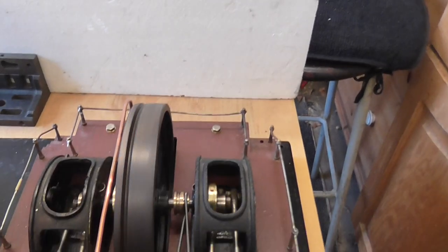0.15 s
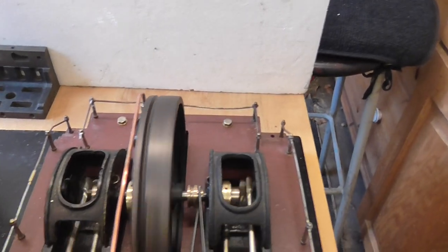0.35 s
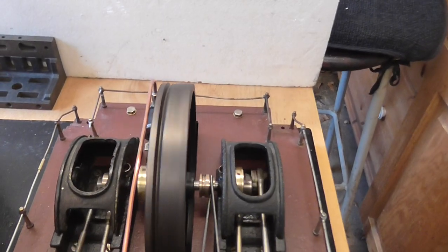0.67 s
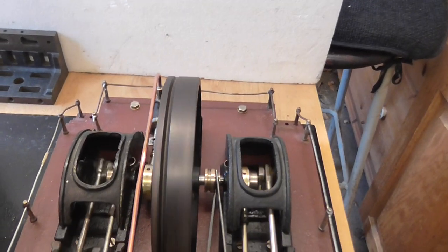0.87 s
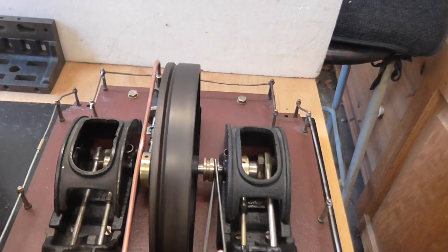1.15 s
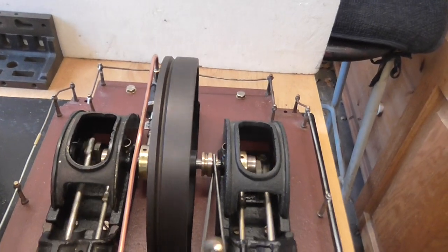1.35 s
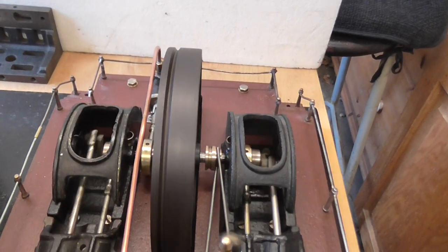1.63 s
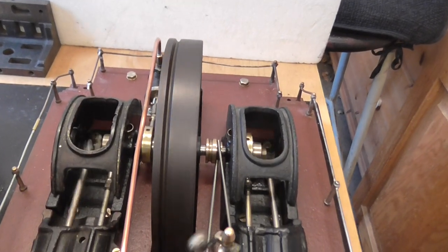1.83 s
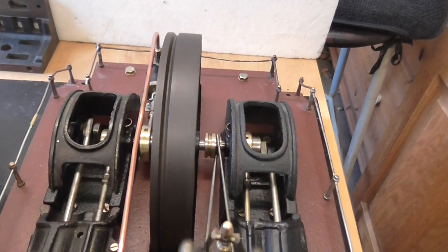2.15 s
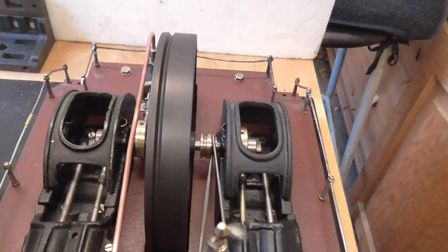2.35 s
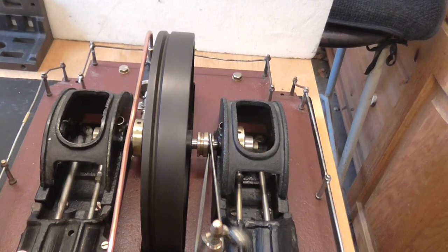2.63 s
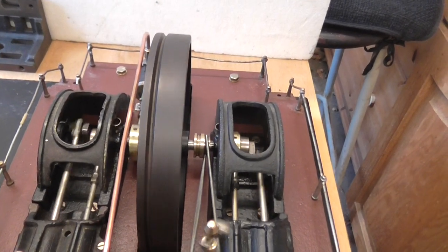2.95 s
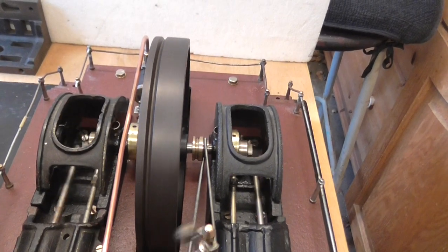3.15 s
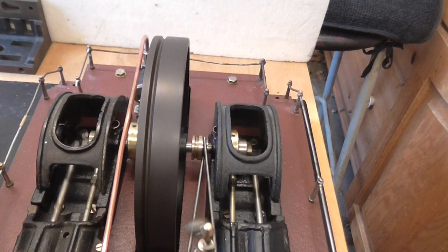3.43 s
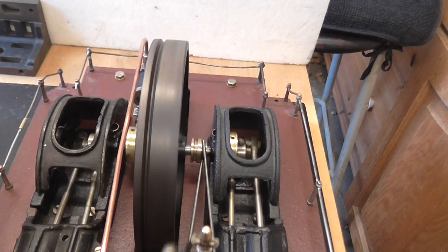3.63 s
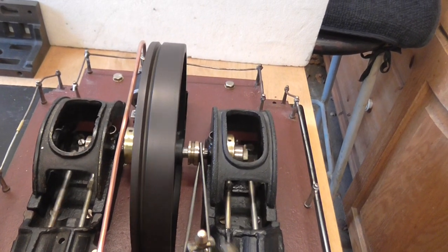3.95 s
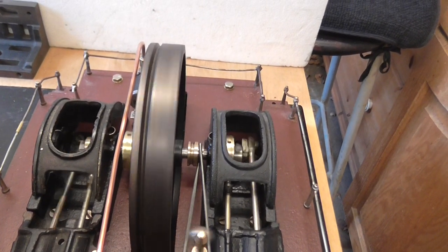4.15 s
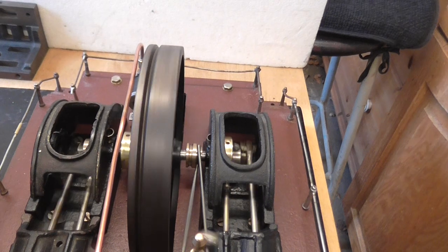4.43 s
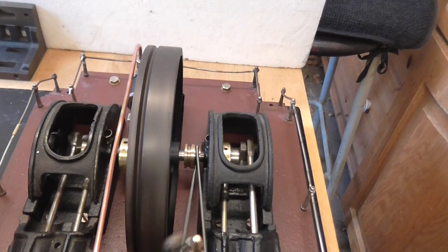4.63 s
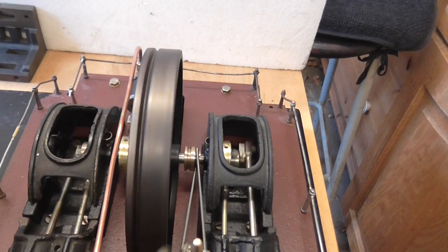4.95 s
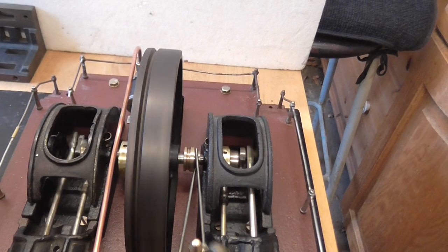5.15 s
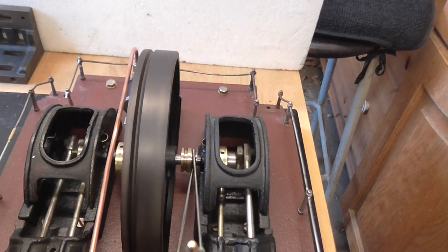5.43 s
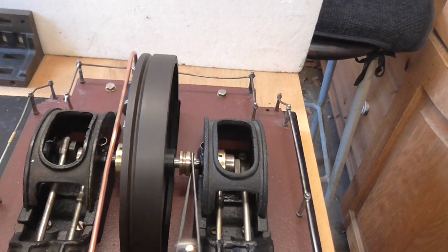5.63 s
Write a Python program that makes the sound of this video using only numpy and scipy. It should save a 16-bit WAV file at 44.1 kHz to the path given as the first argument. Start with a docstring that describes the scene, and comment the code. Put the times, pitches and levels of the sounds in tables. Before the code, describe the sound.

A small model steam engine runs steadily with a fast, even metallic knocking, rhythmic puffs and hiss over a low drone.

```python
"""A model two-cylinder steam engine turns about 3.7 times a second on a bench, close to a hand-held camera.
Play in a rod bearing gives two impacts a turn, out and back, which excite the damped modes of the bed.
Turbulent jets hiss at the glands and puff from the valves in step, over the rumble of the running gear.
The engine seems to run on air: a small mains-driven piston compressor forces the bench into a drone."""
import sys
import numpy as np
from scipy.fft import rfft, irfft, next_fast_len
from scipy.io import wavfile
from scipy.ndimage import map_coordinates

SR = 44100
rng = np.random.default_rng(int(sys.argv[2]) if len(sys.argv) > 2 else 0)


def materialize(psi):
    """Save the field psi as 16-bit PCM at rate SR to the path in sys.argv[1].

    A 1-D psi becomes a single channel; in a 2-D psi each row is a channel.
    """
    bounded = np.clip(np.atleast_2d(psi).T, -1, 1)
    quanta = np.round(bounded * 32767).astype(np.int16)
    wavfile.write(sys.argv[1], SR, quanta)


N = 254898
T = np.arange(N) / SR


def amp(db):
    """Amplitude ratio of a level in decibels."""
    return 10 ** (np.asarray(db) / 20)


def unit(x):
    """Normalisation to rms 1."""
    return x / np.sqrt(np.mean(x ** 2) + 1e-20)


def along(points, hz, column=1):
    """Interpolation of one column of a table on a logarithmic frequency axis."""
    columns = np.transpose(points)
    return np.interp(np.log(hz + 1), np.log(columns[0] + 1), columns[column])


def curve(points, t=T):
    """Linear interpolation of a table in time."""
    return np.interp(t, *np.transpose(points))


def wobble(rate):
    """Smooth random fluctuation, with rate knots a second."""
    return map_coordinates(rng.standard_normal(int(N * rate / SR) + 4), [T * rate])


def filtered(x, response):
    """Linear filtering: the spectrum of x times a frequency response."""
    size = next_fast_len(N + SR // 2)
    return irfft(rfft(x, size) * response(np.fft.rfftfreq(size, 1 / SR)), size)[..., :N]


def add(track, s, sound):
    """Superposition of a sound on a track at time s."""
    start = max(round(s * SR), 0)
    part = track[start:start + len(sound)]
    part += sound[:len(part)]


# the two microphone ports: f/Hz, coherence, left minus right level/dB, phase lead of left/rad
MIC_PORTS = [(150, 0.99, 0, -0.07), (450, 0.95, 0.6, -0.14), (1190, 0.88, 0, 0.34), (2100, 0.97, 0, 0.64),
             (3800, 0.85, -1.5, -0.25), (7200, .94, -1.5, 0), (8200, 0.98, 1.5, -0.46),
             (9200, 0.8, -2.5, -1.64), (10700, 0.14, -8, 1), (13000, 1, -0.5, -0.5)]


def rush(spectrum, peaks=()):
    """Partial coherence: coloured noise of rms 1 at the two ports, with optional resonance peaks."""
    def colour(hz):
        peaks_db = sum(gain / (1 + (2 * (hz - centre) / width) ** 2) for centre, width, gain in peaks)
        angle = np.arccos(np.clip(along(MIC_PORTS, hz), 0, 1)) / 2
        return amp(along(spectrum, hz) + peaks_db) * np.array([np.cos(angle), np.sin(angle)])

    def ports(hz):
        left = amp(along(MIC_PORTS, hz, column=2) / 2) * np.exp(.5j * along(MIC_PORTS, hz, column=3))
        return np.array([left, 1 / left])
    mid, side = filtered(rng.standard_normal((2, N)), colour)
    return unit(filtered(np.array([mid + side, mid - side]), ports))


# the crankshaft, gaining a little speed halfway: t/s, rotation rate/Hz
CRANK_SPEED = [(2.6, 3.720), (2.85, 3.7415)]


def crank(first_knock_s=.042):
    """Phase as the integral of speed: turns of the crankshaft, whole at each heavy knock."""
    turns = np.cumsum(curve(CRANK_SPEED)) / SR
    return turns - np.interp(first_knock_s, T, turns)


def since(turns, phase):
    """Seconds, at mean speed, since the crank last passed a phase; crank phases are in turns."""
    return (turns - phase) % 1 * T[-1] / (turns[-1] - turns[0])


def passes(turns, phase):
    """Times at which the crank passes a phase."""
    return np.interp(np.arange(phase, turns[-1]), turns, T)


def apart(turns, phase):
    """Signed distance of the crank from a phase."""
    return (turns - phase + .5) % 1 - .5


def stroke(turns, start, end, rise, fall):
    """Trapezoidal pulse, once a turn, at half height at start and end."""
    offset, half = apart(turns, (start + end) / 2), (end - start) / 2
    return np.clip(.5 + np.minimum((half + offset) / rise, (half - offset) / fall), 0, 1)


# vibration from the compressor's piston: harmonic of its shaft rate, relative level/dB
PISTON_HARMONICS = [(3, -54), (4, -47), (5, -38.5), (6, -47), (7, -26.5), (8, -34), (9, -30.5), (10, -37),
                    (11, -46), (12, -40.5)]
# hum of its motor: harmonic of the mains, relative level/dB
MOTOR_HARMONICS = [(2, -38.5), (4, -33), (6, -47)]
# transmission of the hum through the bench: f/Hz, gain/dB
BENCH_RESPONSE = [(70, -37), (100, -6), (125, 3.5), (150, 16.5), (175, -1.5), (200, 1), (225, 4), (330, -7)]


def compressor(shaft_hz=24.288, mains_hz=50.042):
    """Forced vibration: strokes shake the bench and modulate the hum, which beats as the motor slips."""
    t = T - .171  # zero when shaft and mains are in phase
    shaft = 2 * np.pi * (shaft_hz * t + .003 * wobble(2))
    tone = lambda angle, db: np.sqrt(2) * amp(db) * np.sin(angle)
    dispersion = lambda k: 0.589 * (k - 8) ** 2  # bending waves smear each stroke
    strokes = sum(tone(k * shaft - dispersion(k), db) for k, db in PISTON_HARMONICS)
    load = np.exp(0.67 * np.cos(shaft - .3))
    hum = sum(tone(2 * np.pi * k * mains_hz * t, db) for k, db in MOTOR_HARMONICS) * load / load.mean()
    return amp(-1.46) * strokes + filtered(hum, lambda hz: amp(along(BENCH_RESPONSE, hz)))


# rolling and sliding of shaft and flywheel: f/Hz, relative level/dB
RUMBLE_SPECTRUM = [(20, -56), (60, -25), (110, -11), (200, 1.5), (420, -1.5), (560, -5.5), (800, -7.5),
                   (1020, -14.5), (1250, -10), (1600, -17.5), (2300, -27), (4000, -30)]


def shaft_rumble():
    """Rolling and sliding contact: low noise of fluctuating level."""
    return amp(-30 + 1.78 * wobble(30)) * rush(RUMBLE_SPECTRUM)


def flywheel(hz=1168):
    """Resonance: one faint mode of the wheel, wavering in phase and level."""
    waver = .8 * wobble(22)
    return amp(-45.5 + 3 * wobble(14)) * np.sin(2 * np.pi * hz * T + waver)


# cavity resonances of the castings, colouring all escaping air: f/Hz, bandwidth/Hz, gain/dB
CASTING_CAVITIES = [(2410, 230, -34), (3202, 310, -15), (3500, 130, 1.5), (4030, 150, 6.5),
                    (4630, 300, 7.5), (6080, 150, 6), (6820, 220, 3.5), (7790, 440, 5), (9000, 150, 1.5),
                    (12060, 220, 9)]
# the jet at the glands: f/Hz, relative level/dB
LEAK_SPECTRUM = [(1200, -27), (2000, -4.5), (2600, -11), (3200, -2.5), (3600, -3), (5000, -3), (5700, 1.5),
                 (7300, -5), (8500, -1), (10300, -10), (12800, -9.5), (14500, -22), (16000, -45)]


def gland_leak(turns, splutter):
    """Turbulent leakage: a constant hiss that grows with pressure in the power stroke and at each puff."""
    power_stroke = stroke(turns, start=0.51, end=0.87, rise=0.4, fall=0.038)
    puffing = sum(pulse for pulse, db in valve_pulses(turns))
    db = -33 + 1.5 * power_stroke + 3.5 * puffing
    return amp(db + 0.69 * wobble(25.04) + .5 * splutter) * rush(LEAK_SPECTRUM, CASTING_CAVITIES)


# nearness of the microphone to the exhaust: t/s, gain/dB
PROXIMITY = [(0, -1.5), (.5, -0.3), (1, -1), (1.6, -1), (3.3, -0.5), (4.4, -0.1), (5.7, 0.5)]
# the exhaust jet: f/Hz, relative level/dB
EXHAUST_SPECTRUM = [(2000, -24), (4000, -21), (5500, -10), (7300, -3), (8300, 3), (9500, -2), (10300, -7.5),
                    (13000, -7.5), (14500, -19), (16000, -34)]


def exhaust(turns, splutter, opens=0.58, shuts=0.916, opening=0.046, seep_db=-40, open_db=-33):
    """Jet noise: the valve seeps when shut and vents once a turn, hardest in the first blowdown."""
    blowdown_db = 3.5 * np.exp(-abs(apart(turns, opens + opening / 2)) / 0.047)
    valve = stroke(turns, opens, shuts, rise=opening, fall=0.12)
    flow = amp(seep_db) + amp(open_db + blowdown_db) * valve
    gain = amp(curve(PROXIMITY) + 0.34 * wobble(22) + splutter)
    return flow * gain * rush(EXHAUST_SPECTRUM, CASTING_CAVITIES)


# the sliding crosshead: f/Hz, relative level/dB
SCRAPE_SPECTRUM = [(500, -30), (950, -4), (1280, 13.5), (1700, 1), (2600, -16), (6000, -72)]


def crosshead(turns, t60=0.21):
    """Sliding friction: a decaying scrape that starts just before dead centre."""
    return amp(-33 - 60 * since(turns, 0.95) / t60) * rush(SCRAPE_SPECTRUM)


def ringing(hz, db, t60, count, swell_s, scatter_db, scatter_rad):
    """Damped free vibration: count nearly equal rings, each of rms 1 over its first 50 ms."""
    t = np.arange(SR // 4) / SR
    hz, db, t60 = (np.reshape(v, (-1, 1)) for v in (hz, db, t60))
    envelope = amp(db - 60 * t / t60) * (1 - np.exp(-(t / swell_s) ** 2))
    modes = envelope * np.exp(2j * np.pi * (hz * t + rng.random(hz.shape)))
    size, shift = rng.standard_normal((2, count, len(hz)))
    rings = ((amp(scatter_db * size) * np.exp(1j * scatter_rad * shift)) @ modes).real
    return rings / rings[:, :SR // 20].std(axis=1, keepdims=True)


# modes of bed plate and bench: f/Hz, level/dB in the heavy knock, level/dB in the return knock, T60/s
BED_MODES = [(302.4, -7.5, -14.5, 0.29), (355.7, -4, -12.5, 0.22), (396.2, 4, -2, 0.098),
             (432, -27, 2.5, 0.069), (483.3, -1, -2.5, 0.24), (542.5, 0, 0.5, 0.18),
             (572.4, 3.5, -9.5, 0.071), (649, -0.5, -1.5, 0.069), (690.6, -1.5, -5.5, 0.076),
             (742.4, -4, -3, 0.11), (777, -4.5, -14, 0.072), (884.5, 0, -10, 0.09),
             (940.4, -13, -23.5, 0.33), (1090, -8.5, -14.5, 0.058), (1291, -8, -33, 0.075),
             (1410, -31.5, -30, 0.058), (1536, -22, -34, 0.045), (1635, -9.5, -28, 0.061),
             (1877, -21, -30, 0.1)]
# force of the heavy knock: t/s, relative level/dB
KNOCK_FORCE = [(0, -23), (1, -20), (2.5, -20.5), (3.8, -23.5), (4.4, -22.5), (5.7, -21.5)]
# boom of the hollow base: t/s, relative level/dB
BASE_BOOM = [(.3, -31), (1.1, -23.5), (1.6, -25), (2.2, -21.5), (3.3, -17), (4.8, -16.5), (5.5, -24)]
RETURN_PHASE = .563  # turns from the heavy knock to the return knock


def bearing_knocks(turns, seat_s=.011, boom_lag_s=.00504, reseat_s=.015):
    """Impact excitation: the slack bearing rings the bed hard, then lightly; it touches, then seats."""
    hz, heavy_db, light_db, t60 = np.transpose(BED_MODES)
    out_s, back_s = passes(turns, 0), passes(turns, RETURN_PHASE)
    count = len(out_s)
    out_db, back_db = curve(KNOCK_FORCE, out_s), rng.normal(-24, 0.24, count)
    heavy = lambda: ringing(hz, heavy_db, t60, count, swell_s=.0031, scatter_db=2.6, scatter_rad=.28)
    light = lambda: ringing(hz, light_db, .94 * t60, count, swell_s=.0021, scatter_db=1, scatter_rad=.35)
    boom = ringing(hz=423.4, db=0, t60=.091, count=count, swell_s=.0099, scatter_db=0, scatter_rad=.66)
    blows = [(out_s, out_db - 3.5, heavy()),
             (out_s + seat_s, out_db - 1.5, heavy()),
             (out_s + boom_lag_s, curve(BASE_BOOM, out_s) - .3, boom),
             (back_s, back_db - 1, light()),
             (back_s + reseat_s, back_db - 4.5, light())]
    bed = np.zeros(N)
    for times, levels_db, rings in blows:
        for start, level_db, ring in zip(times, levels_db, rings):
            add(bed, start, amp(level_db) * ring)
    return bed * amp([[.3], [-.3]])  # slightly to the left


# metal meeting metal in the bearing: f/Hz, relative level/dB
CRACK_SPECTRUM = [(200, -22), (500, 6.5), (900, -1), (1600, -6), (2000, -13.5), (2400, -11.5), (3200, -19),
                  (6000, -60), (15000, -46)]


def bearing_crack(turns, heavy_t60=0.14, light_t60=0.075):
    """Contact transient: a noise burst starts each ring; the heavy one grows with the force."""
    excess_db = curve(KNOCK_FORCE) - curve(KNOCK_FORCE, passes(turns, 0)).mean()
    heavy = amp(-23 + 0.43 * excess_db - 60 * since(turns, 0.00804) / heavy_t60)
    light = amp(-30 - 60 * since(turns, RETURN_PHASE) / light_t60)
    return (heavy + light) * rush(CRACK_SPECTRUM)


# the valves cracking open: phase/turn, width/turn, level/dB
VALVE_OPENINGS = [(0.021, 0.021, -30), (.335, 0.021, -33)]


def valve_pulses(turns):
    """Pulsed flow: a Gaussian envelope and a level for each brief opening."""
    return [(np.exp(-(apart(turns, at) / width) ** 2 / 2), db) for at, width, db in VALVE_OPENINGS]


# the jet through a barely open valve: f/Hz, relative level/dB
PUFF_SPECTRUM = [(2000, -16), (4000, -15.5), (6000, -2.5), (8000, 0.5), (9500, 8.5), (10500, -3),
                 (12000, -3), (13400, 4), (14500, -23), (16000, -19)]


def valve_puffs(turns):
    """Transient jets: two short bright puffs a turn."""
    envelope = sum(amp(db + curve(PROXIMITY)) * pulse for pulse, db in valve_pulses(turns))
    return envelope * rush(PUFF_SPECTRUM, CASTING_CAVITIES)


def reflected(x, wall_db=-14.5, reach_s=.005, drift_s=.00004, count=6):
    """Comb filtering at equal rms: near surfaces return copies whose delays drift as the camera moves."""
    out = x.copy()
    for delay in rng.uniform(reach_s / 10, reach_s, count):
        late = T - delay - drift_s * wobble(1)
        out += amp(wall_db) * np.array([np.interp(late, T, side) for side in x])
    return x.std() * unit(out)


def scene():
    """Superposition of the engine's moving parts, its escaping air and the compressor."""
    turns = crank()
    knocks = bearing_knocks(turns) + bearing_crack(turns)
    running_gear = shaft_rumble() + crosshead(turns) + flywheel()
    splutter = wobble(350)  # oil in the valve ports breaks up the jet
    air = gland_leak(turns, splutter) + exhaust(turns, splutter) + valve_puffs(turns)
    return knocks + running_gear + reflected(air) + compressor()


def record(dry, top_hz=15800):
    """Ideal low-pass filtering: the camera passes nothing above its band limit."""
    return filtered(dry, lambda hz: hz < top_hz)


dry = scene()
out = record(dry)
materialize(out)
```